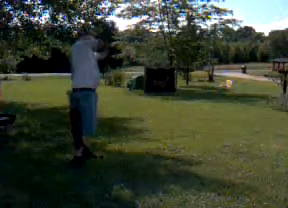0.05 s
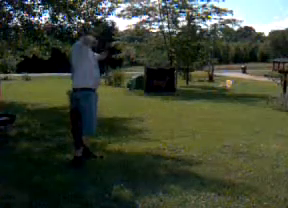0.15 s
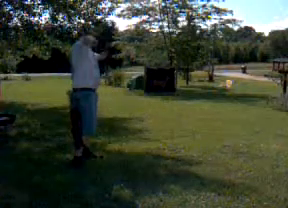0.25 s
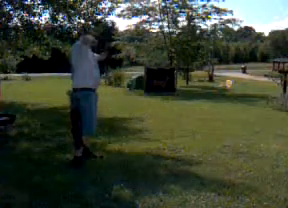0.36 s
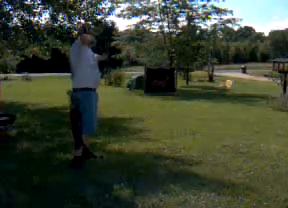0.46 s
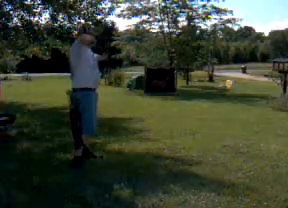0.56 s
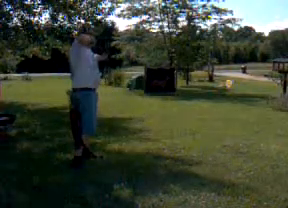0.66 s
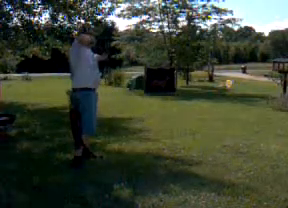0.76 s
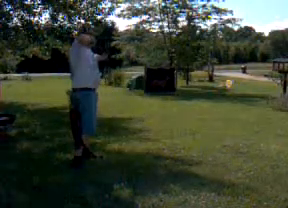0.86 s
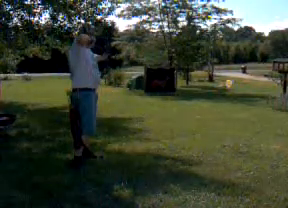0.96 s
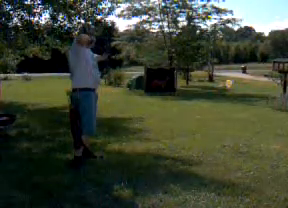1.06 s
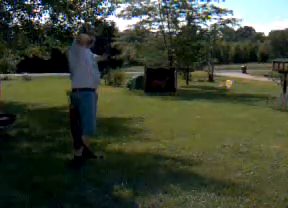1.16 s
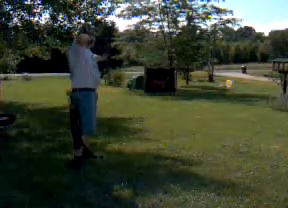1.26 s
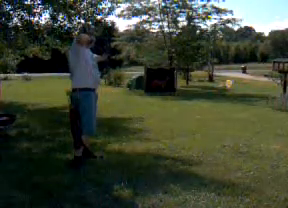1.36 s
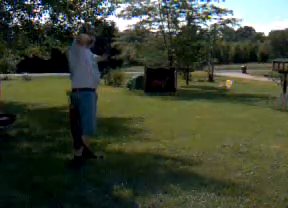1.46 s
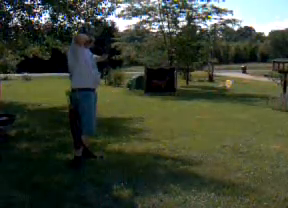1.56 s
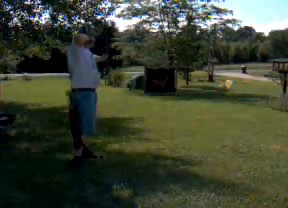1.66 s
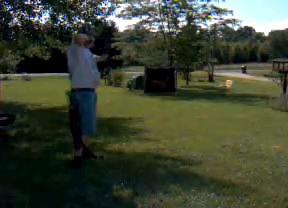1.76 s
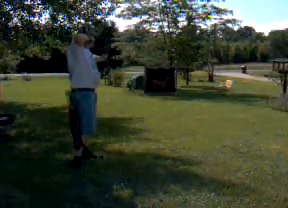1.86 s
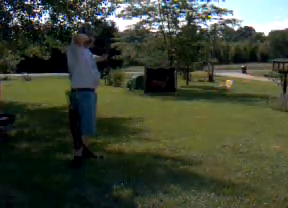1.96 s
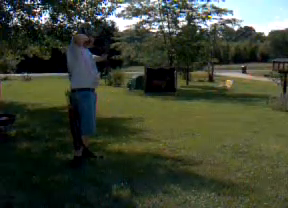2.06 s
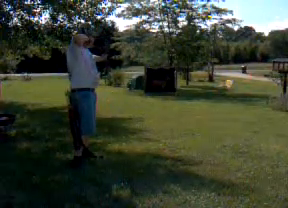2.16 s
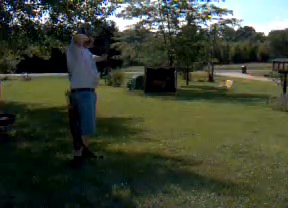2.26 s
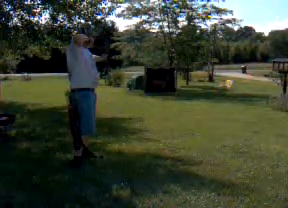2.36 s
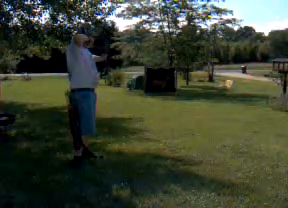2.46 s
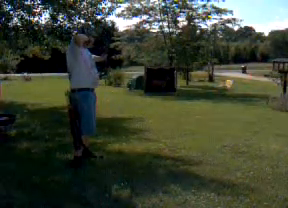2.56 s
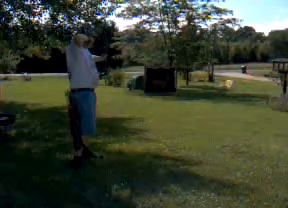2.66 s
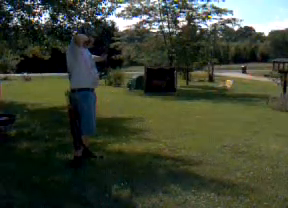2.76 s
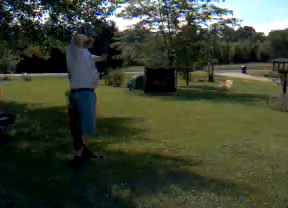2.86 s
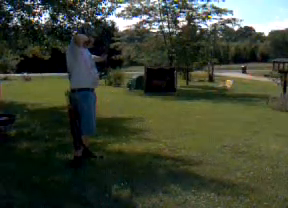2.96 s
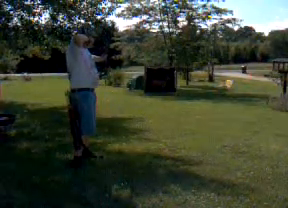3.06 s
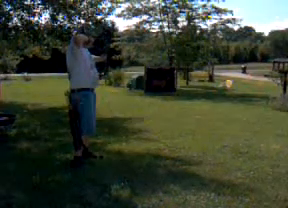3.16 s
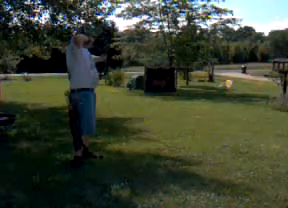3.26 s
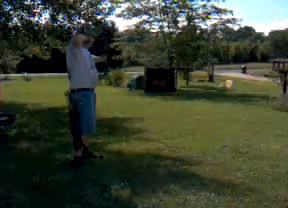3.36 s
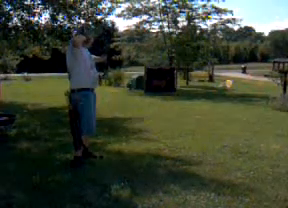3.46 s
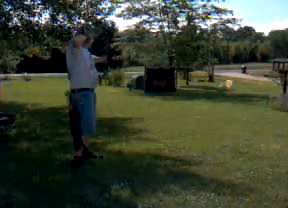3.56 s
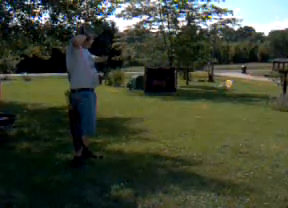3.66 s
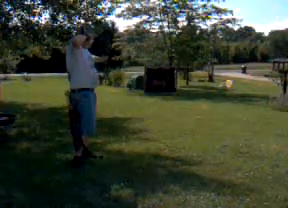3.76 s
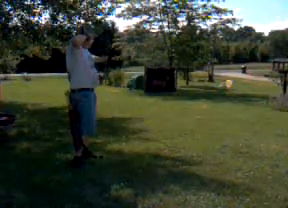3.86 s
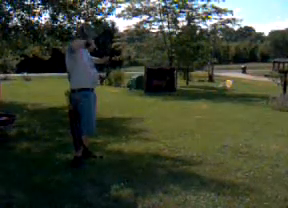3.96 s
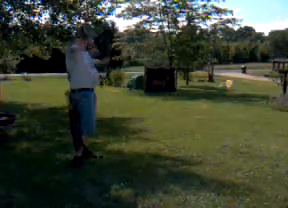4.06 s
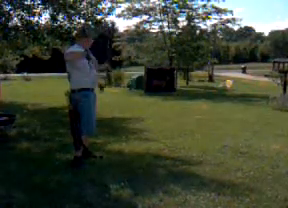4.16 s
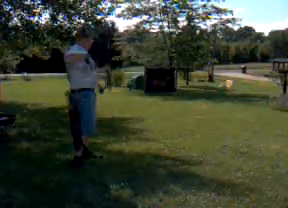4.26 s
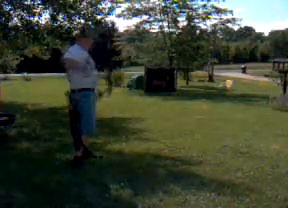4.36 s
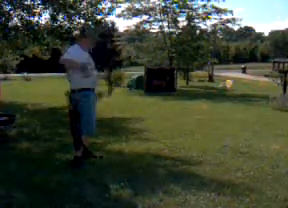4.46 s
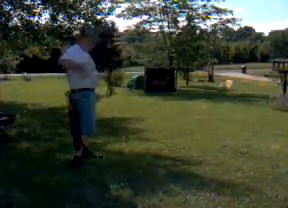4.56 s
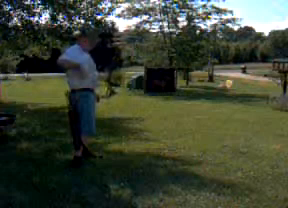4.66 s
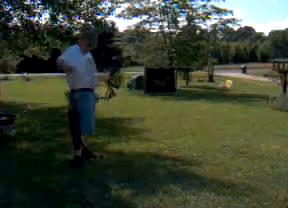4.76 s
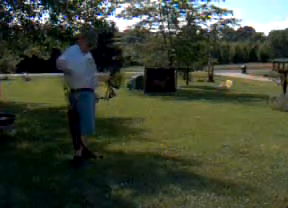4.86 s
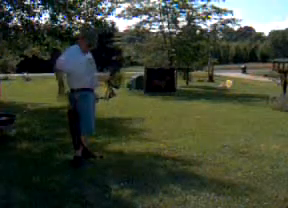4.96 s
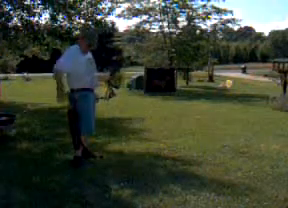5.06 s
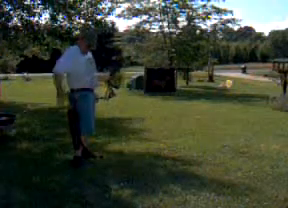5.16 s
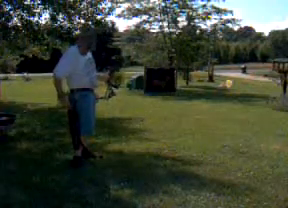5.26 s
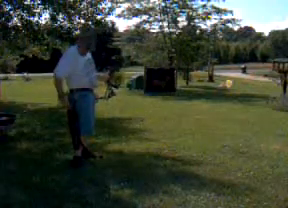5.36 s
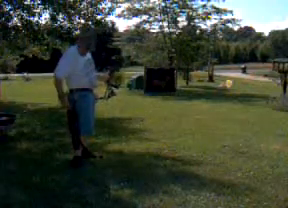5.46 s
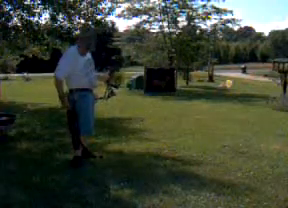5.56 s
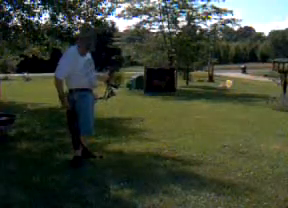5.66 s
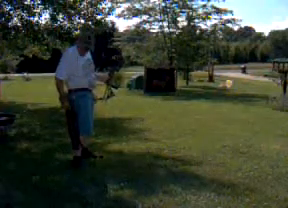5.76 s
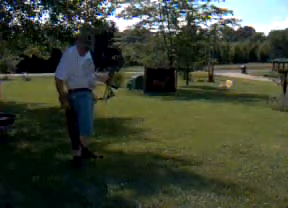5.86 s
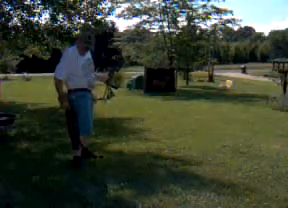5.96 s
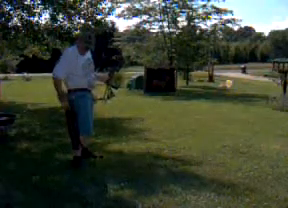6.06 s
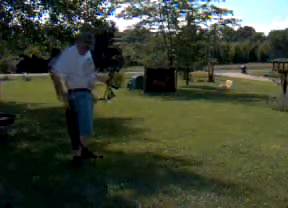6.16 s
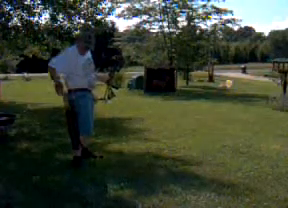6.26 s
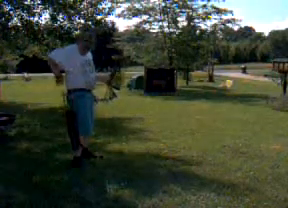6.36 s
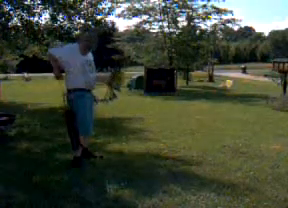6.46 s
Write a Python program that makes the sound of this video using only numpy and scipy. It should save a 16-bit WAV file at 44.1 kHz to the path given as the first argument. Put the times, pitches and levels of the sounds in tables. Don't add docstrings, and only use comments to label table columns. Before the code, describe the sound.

Quiet hissy garden with birdsong; a sharp bowstring slap, a quick distant crack and thud, a brief dropout, then clinking and rustling.

```python
import sys
import numpy as np
from scipy import signal
from scipy.fft import rfft, irfft
from scipy.io import wavfile
from scipy.ndimage import uniform_filter1d

SR = 44100
rng = np.random.default_rng(int(sys.argv[2]) if len(sys.argv) > 2 else 0)


def invert_db(x):
    u = np.asarray(x, float) / 20
    return 10 ** u


def put_to_file(sound):
    columns = np.atleast_2d(sound).T
    safe = np.clip(columns, -1, 1)
    whole_steps = np.round(safe * 32767)
    wavfile.write(sys.argv[1], SR, whole_steps.astype(np.int16))


N = 287397


def decay(t, t60):
    return np.exp(-np.log(1000) * t / t60)


def colour(x, points):
    hz, db = np.transpose(points)
    f = np.maximum(np.arange(2049) * SR / 4096, 1)
    gain_db = np.maximum(np.interp(np.log(f), np.log(hz), db), -70)
    ceps = irfft(np.log(invert_db(gain_db)))
    ceps[1:2048] *= 2
    ceps[2049:] = 0
    response = irfft(np.exp(rfft(ceps)))[:2048]
    return signal.fftconvolve(x, response)[:len(x)]


def band(x, hz, width_hz):
    return signal.lfilter(*signal.iirpeak(min(hz, 5400), hz / width_hz, fs=SR), x)


def burst(ring_s, rise_s, grit_db):
    t = np.arange(4096) / SR
    noise, contacts = rng.standard_normal((2, 4096))
    shape = (1 - np.exp(-t / rise_s)) * decay(t, ring_s)
    return shape * noise * invert_db(grit_db * np.repeat(contacts[::32], 32))


def add(out, s, db, piece):
    i = int(s * SR)
    piece = piece[:N - i]
    out[i:i + len(piece)] += piece * invert_db(db) / np.abs(piece).max()


def ring(modes, s, db):
    t = np.maximum(np.arange(N) / SR - s, 0)
    return invert_db(db) * sum(invert_db(g) * np.sin(2 * np.pi * hz * t) * decay(t, t60) for hz, g, t60 in modes)


def scatter(x, low_t60, high_t60, low_db, high_db, split_hz=3000):
    t = np.arange(SR) / SR
    noise = rng.standard_normal(SR) * (1 - np.exp(-t / 0.0075))
    noise *= invert_db(0.95 * np.repeat(rng.standard_normal(SR // 100), 100))
    low = signal.lfilter(*signal.butter(1, split_hz, fs=SR), noise)
    high = signal.lfilter(*signal.butter(2, split_hz, "high", fs=SR), noise)
    tail = low * invert_db(low_db) * decay(t, low_t60) + high * invert_db(high_db) * decay(t, high_t60)
    return x + signal.fftconvolve(x, tail)[:N]


def blurred(rows, width_hz, share):
    noise, out = rng.standard_normal(N), np.zeros(N)
    for s, length, hz, db in rows:
        near = slice(int(s * SR) - 2000, int(s * SR) + 12000)
        t = np.arange(N)[near] / SR
        width = width_hz + share * hz
        blur = band(band(noise[near], hz, width), hz, width)
        gate = np.clip(np.minimum(t - s, s + length - t) / 0.016, 0, 1)
        out[near] += gate * invert_db(db) * blur / blur.std()
    return out


# (frequency [Hz], density [dB per Hz])
AIR_COLOUR = [(15, -24), (25, -5), (33, -8.5), (113, -6), (230, -8.5), (514, -7), (1420, -7.5),
              (2600, -7.5), (3800, -9.5), (4600, -9.5), (5300, -8), (5600, -10), (7150, -38)]
# (frequency [Hz], rms level [dB])
WHINE = [
    (235, -76),
    (1378, -73),
    (5240, -72),
]


def air():
    hiss = colour(rng.standard_normal(N), AIR_COLOUR)
    swell = uniform_filter1d(rng.standard_normal(N), 12000) * np.sqrt(12000)
    whine = sum(invert_db(db) * band(rng.standard_normal(N), hz, 12) * 35 for hz, db in WHINE)
    return hiss / hiss.std() * invert_db(-56.5 + 0.1 * swell) + whine


# (time [s], peak level [dB], centre
# [Hz], thud level [dB])
KNOCKS = [
    (2.026, -44.5, 940, -9),
    (2.437, -42.5, 915, -5),
    (2.796, -36, 875, -1.5),
    (3.129, -34.5, 920, -15),
    (4.0254, -38, 785, -5.5),
    (4.2, -62, 980, 8),
    (6.189, -51, 300, 5),
    (6.301, -59, 900, -10),
    (6.453, -47, 900, -20),
]


def knocks():
    out = np.zeros(N)
    for s, db, hz, thud_db in KNOCKS:
        crackle = burst(0.036, 0.00015, 2.4)
        wood = band(band(band(crackle, hz, 1500), hz, 1500), hz, 2510)
        add(out, s, db, wood + invert_db(thud_db + 9) * band(crackle, 140, 90))
    return out


SWELL_S = .008


def whistle(out, waver, start, end, hz, db, rise_s=SWELL_S):
    near = slice(int(start * SR) - 1000, int(end * SR) + 1000)
    t = np.arange(N)[near] / SR
    far = np.clip((-55 - db(t)) / 8, 0, 1)
    turns = np.cumsum(uniform_filter1d(hz(t), 300) * (1 + .004 * waver[0, near])) / SR
    gate = np.clip(np.minimum((t - start) / rise_s, (end - t) / SWELL_S + .5), 0, 1)
    level = np.sqrt(2) * invert_db(db(t) + (2.5 + .6 * far) * waver[1, near])
    out[near] += gate * level * np.sin(2 * np.pi * turns)


def trill(out, waver):
    start, climbed, peak, end = 2.08, 2.21, 2.23, 2.55
    throb_per_s, throb_db = 25.2, 3.5
    whistle(out, waver, start, end, lambda t: np.interp(t, [start, climbed], [4430, 4600]),
            lambda t: np.interp(t, [start, peak, end], [-61, -55.5, -79])
            + throb_db * (np.sin(2 * np.pi * throb_per_s * t) - .5))


# (time [s], length [s], from [Hz], to [Hz], rms level [dB])
SLIDES = [(0.115, 0.027, 3560, 3420, -60.5), (0.149, 0.02, 3250, 3070, -56),
          (1.072, 0.027, 2350, 3320, -54), (1.208, 0.012, 2450, 2950, -50), (1.618, 0.027, 3940, 3330, -64),
          (1.654, 0.095, 3950, 3300, -66), (1.826, 0.06, 4720, 4610, -65), (1.891, 0.17, 4250, 4430, -67.5),
          (2.714, 0.034, 4720, 4600, -62), (2.761, 0.12, 4500, 3830, -65), (2.89, 0.067, 4100, 4200, -64),
          (3.018, 0.055, 4200, 3800, -66), (3.067, 0.04, 3280, 2690, -61), (4.768, 0.043, 3990, 4160, -61),
          (4.861, 0.026, 4570, 4450, -65), (5.203, 0.033, 4060, 4130, -67),
          (5.634, 0.057, 3450, 2930, -55.5), (6.172, 0.03, 3320, 2360, -54)]


def slides(out, waver):
    for s, length, a, b, db in SLIDES:
        whistle(out, waver, s, s + length, lambda t: np.interp(t, [s, s + length], [a, b]), lambda t: db + 0 * t)


# (time [s], length [s], from [Hz], held [Hz], rms level [dB])
HOOKS = [
    (3.35, 0.086, 3900, 3380, -49),
    (4.942, 0.046, 3150, 2850, -57),
    (5.224, 0.082, 4040, 3390, -50.5),
    (5.294, 0.082, 3540, 3370, -62),
    (5.588, 0.047, 3510, 3320, -50.5),
    (5.847, 0.1, 3690, 3290, -47),
    (6.088, 0.12, 3570, 3260, -52),
    (6.198, 0.031, 2430, 2100, -54),
    (6.352, 0.082, 3210, 3000, -54),
    (6.462, 0.085, 2310, 2210, -53),
]


def hooks(out, waver):
    drop_s, swell_s, sag_db_per_s = .017, 0.021, 75.5
    for s, length, a, b, db in HOOKS:
        whistle(out, waver, s, s + length, lambda t: b + (a - b) * np.exp(-np.maximum(t - s, 0) / drop_s),
                lambda t: db - sag_db_per_s * (t - s), swell_s)


# (time [s], pitch [Hz], rms level [dB])
PHRASES = [
    [(0.2, 3338, -55), (0.23, 3370, -54), (0.252, 2643, -47), (0.278, 2442, -47.5), (0.324, 2443, -53.5),
     (0.392, 2941, -45.5), (0.416, 2438, -44), (0.45, 2371, -47.5), (0.48, 2482, -58)],
    [(1.085, 2859, -63), (1.103, 2637, -44), (1.131, 2566, -45), (1.153, 2566, -49.5), (1.179, 2304, -47),
     (1.193, 2296, -46.5), (1.225, 2541, -45.5), (1.237, 2518, -42.5), (1.3, 2522, -68)],
]


def phrases(out, waver):
    for s, hz, db in map(np.transpose, PHRASES):
        whistle(out, waver, s[0], s[-1], lambda t: np.interp(t, s, hz), lambda t: np.interp(t, s, db))


# (time [s], length [s], pitch [Hz], rms level [dB])
FAR_CALLS = [(.25, 0.25, 3370, -66.5), (0.452, 0.035, 3864, -56.5), (0.55, 0.035, 2405, -55.5),
             (3.667, 0.05, 2420, -60.5), (5.06, 0.086, 4830, -64.5), (5.22, 0.076, 4080, -65),
             (5.493, 0.14, 4370, -61), (5.67, 0.14, 1840, -64), (5.721, 0.079, 3000, -61),
             (5.8, .025, 3450, -51.5), (5.839, 0.053, 4130, -53.5), (5.87, 0.082, 1755, -76),
             (6.146, 0.054, 4000, -64), (6.228, 0.16, 1722, -62), (6.266, 0.03, 3940, -45),
             (6.34, 0.044, 2820, -59)]


def birds():
    waver = uniform_filter1d(rng.standard_normal((2, N)), 300, axis=1) * np.sqrt(300)
    out = blurred(FAR_CALLS, 0, .025)
    for song in (phrases, hooks, slides, trill):
        song(out, waver)
    return scatter(out, 0.58, 0.38, -35.5, -30.0)


# (time [s], rms level [dB], fade [dB per s])
BRUSHES = [
    (5.478, -38, 367),
    (5.552, -58, 29.5),
    (5.801, -57, 29),
    (6.09, -69, 71.5),
    (6.215, -52.5, 69),
    (6.27, -56.5, 55),
    (6.44, -70, 12),
]


def rustle():
    t = np.arange(N) / SR
    grain = rng.standard_normal(N) * invert_db(5.3 * np.repeat(rng.standard_normal(N // 90 + 1), 90)[:N])
    cloth = band(grain, 3670, 3200)
    rise_s = 0.0082
    strokes = sum(np.clip((t - s) / rise_s, 0, 1) * invert_db(db + 1 - fade * np.abs(t - s)) for s, db, fade in BRUSHES)
    return strokes * cloth / cloth.std()


# (time [s], peak level [dB], centre [Hz])
CLINKS = [(5.4817, -20, 4360), (5.4854, -22, 5070), (5.49, -26, 4970), (5.505, -28, 3200),
          (5.513, -33.5, 4940), (5.543, -36, 4830), (5.592, -40, 3550), (5.622, -34.5, 4270),
          (5.632, -25.5, 2870), (5.668, -34.5, 5100), (5.685, -37, 2840), (5.701, -37, 5000),
          (5.755, -41.5, 2880), (5.789, -32, 2900), (5.82, -38, 4910), (5.94, -38, 5170),
          (5.986, -31, 4770), (6.073, -15, 3300), (6.077, -22, 5440), (6.079, -29, 5450),
          (6.103, -37.5, 3440), (6.113, -39, 3410), (6.205, -30.5, 3530), (6.23, -37.5, 3490),
          (6.265, -40.5, 5090), (6.279, -27.5, 5430), (6.301, -32, 3400), (6.312, -26, 5170),
          (6.335, -29.5, 5160), (6.456, -35, 2450)]
# (time [s], length [s], pitch [Hz], rms level [dB])
SQUEAKS = [
    (5.245, 0.059, 3900, -58),
    (6.0, 0.036, 3000, -53),
    (6.2, 0.064, 3570, -54),
    (6.287, 0.03, 3420, -38.5),
    (6.337, 0.063, 3250, -50.5),
    (6.406, 0.067, 2620, -56),
    (6.44, 0.078, 2330, -52.5),
]


def gear():
    out = rustle()
    for s, db, hz in CLINKS:
        rise_s = .0005 * invert_db(-.4 * (db + 19))
        ring_s = 0.014 if db > -24 else 0.026
        crackle = burst(0.82 * ring_s + 6 * rise_s, rise_s, 2.1)
        bright = band(crackle, hz, 810) + band(crackle, 5700, 3200)
        knock_db = -12 + 7 * rng.standard_normal()
        add(out, s - rise_s / 2, db + 2, bright + invert_db(knock_db) * band(crackle, 820, 3400))
    return scatter(out + blurred(SQUEAKS, 450, 0), 0.55, 0.49, -39.5, -40.5)


def quiver(count):
    out = np.zeros(N)
    start_s, gap_s = 3.503, 0.0055
    for k in range(count):
        s = start_s + gap_s * (k + 0.123 * rng.standard_normal())
        add(out, s, -24.5 - 2 * k, band(burst(.014, 0.00066, 2.5), 5300, 2200))
    return out


# (time [s], peak level [dB], ring [s], dull above [Hz])
STRIKE = [
    (3.474, -36.5, 0.056, 1000),
    (3.49, -2.5, 0.00063, 9000),
    (3.491, -16, 0.0052, 8920),
    (3.493, -17.5, 0.0067, 2430),
    (3.4968, -21, 0.0037, 9000),
    (3.498, -15.5, 0.0023, 9050),
    (3.521, -37.5, 0.049, 1300),
]
# (frequency [Hz], density [dB per Hz])
STRIKE_COLOUR = [(100, -40), (455, -25), (673, -13.5), (1000, -16.5), (1400, -6.5), (2000, -4.5),
                 (3300, -6), (4400, -6.5), (5500, -3.5), (7000, -35.5)]
# (frequency [Hz], level [dB], fade by 60 dB [s])
TARGET = [
    (60, -15, 0.038),
    (190, -4.5, 0.031),
    (300, 1, 0.033),
    (650, -3, 0.035),
]


def strike():
    out = np.zeros(N)
    for s, db, ring_s, dull_hz in STRIKE:
        crack = colour(burst(ring_s, ring_s / 15, 1.5), STRIKE_COLOUR)
        add(out, s, db, signal.lfilter(*signal.butter(2, dull_hz, fs=SR), crack))
    thuds = ring(TARGET, 3.494, -33) + ring(TARGET, 3.526, -40)
    return scatter(out + thuds, 0.29, 0.37, -42.5, -34.5, split_hz=5000)


# (time [s], peak level [dB], ring [s])
SHOT = [(3.25, -26, 0.0082), (3.255, -8.5, 0.006), (3.2567, -14.5, 0.016), (3.264, -20, 0.02),
        (3.27, -3.5, 0.022), (3.271, -13, 0.0097), (3.275, -7, 0.012), (3.2787, -4, 0.017),
        (3.2851, -11, 0.025), (3.288, -18, 0.012), (3.294, -5, 0.014), (3.2971, -18, 0.023),
        (3.301, -11, 0.013), (3.3054, -9, 0.016), (3.3082, -18.5, 0.0092)]
# (frequency [Hz], density [dB per Hz])
SHOT_COLOUR = [(24, -56), (40, -25.5), (290, -8), (570, -11.5), (898, -10.5), (1130, -12.5), (1250, -7.5),
               (2000, -7), (2180, -8.5), (2960, -3), (5500, -1), (7150, -30.5), (12100, -120)]
# (frequency [Hz], level [dB], fade by 60 dB [s])
LIMBS = [
    (62, -4.5, .12),
    (150, -7, .06),
    (290, -8, 0.034),
]


def shot():
    out = np.zeros(N)
    for s, db, ring_s in SHOT:
        add(out, s - .0005, db - 4, colour(burst(2.42 * ring_s, 0.00051, 1.8), SHOT_COLOUR))
    thuds = ring(LIMBS, 3.256, -52.5) + ring(LIMBS, 3.272, -37)
    return scatter(out + thuds, 0.25, 0.39, -36.5, -40.5)


def scene():
    return (shot() + strike() + gear() + knocks() + birds() + air() + quiver(count=6))[None]


def low_pass(x):
    return signal.sosfilt(signal.butter(12, 15800, fs=SR, output="sos"), x)


def record(dry):
    hold, offset, top_hz = 4, .00347, 6780
    dropout_start_s, dropout_end_s = 3.76033, 3.86422
    lifted = dry + .5 * signal.lfilter(*signal.butter(2, 3500, "high", fs=SR), dry)
    smooth = signal.sosfilt(signal.butter(10, SR / hold / 2, fs=SR, output="sos"), lifted)
    smooth = .42 * np.tanh(smooth / .42)
    held = np.repeat(smooth[:, ::hold], hold, axis=1)[:, :N] + offset
    cut = signal.sosfiltfilt(signal.cheby1(14, .05, top_hz, fs=SR, output="sos"), held)
    t = np.arange(N) / SR
    return low_pass(cut * ((t < dropout_start_s) | (t > dropout_end_s)))


dry = scene()
out = record(dry)
put_to_file(out)
```